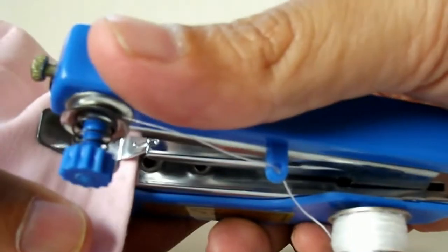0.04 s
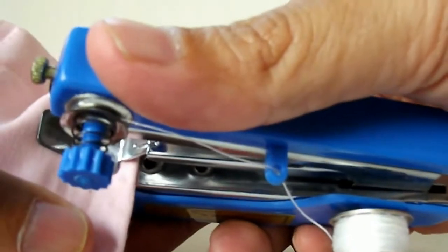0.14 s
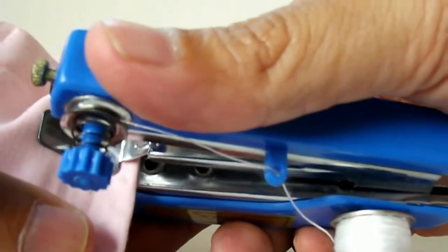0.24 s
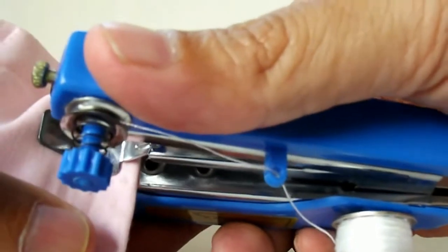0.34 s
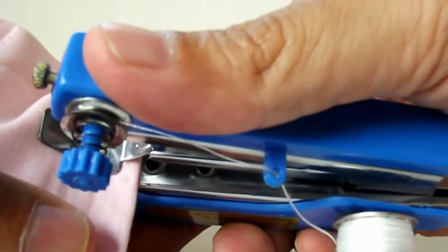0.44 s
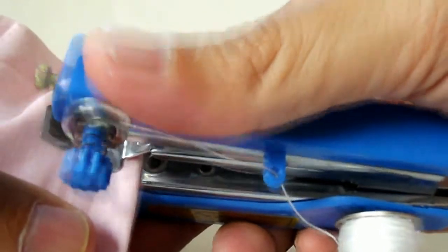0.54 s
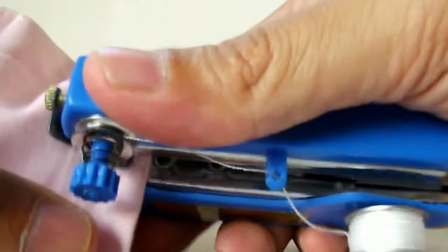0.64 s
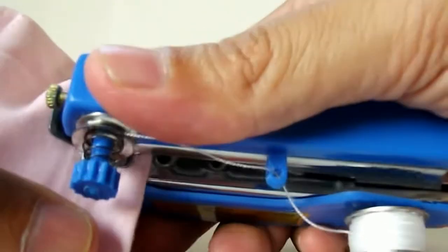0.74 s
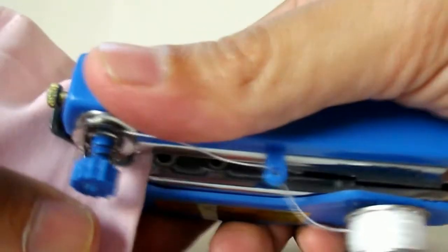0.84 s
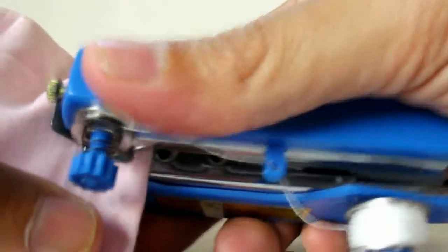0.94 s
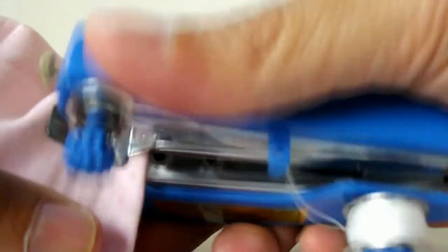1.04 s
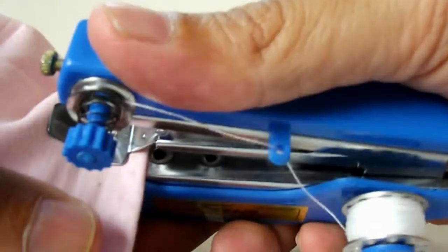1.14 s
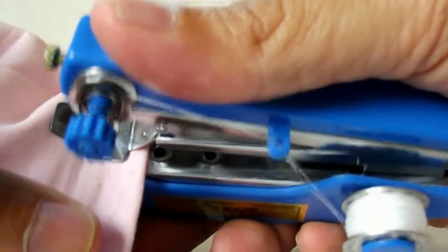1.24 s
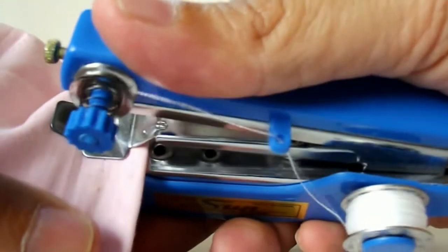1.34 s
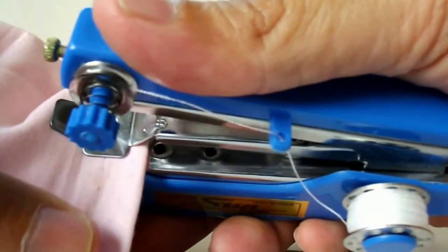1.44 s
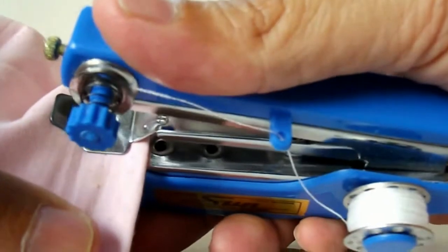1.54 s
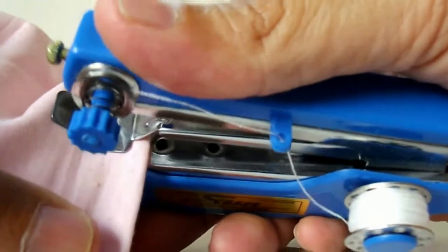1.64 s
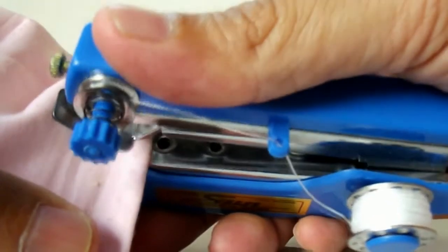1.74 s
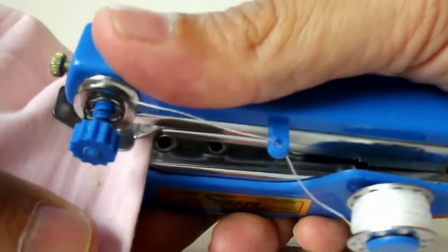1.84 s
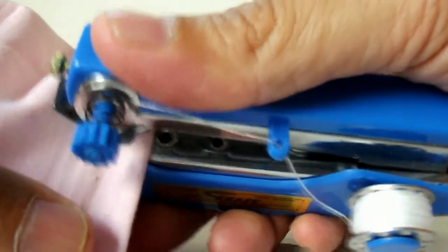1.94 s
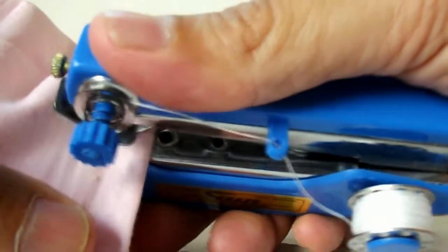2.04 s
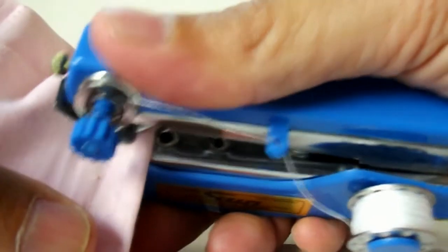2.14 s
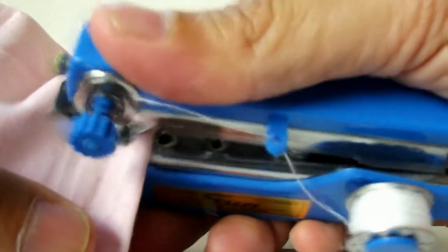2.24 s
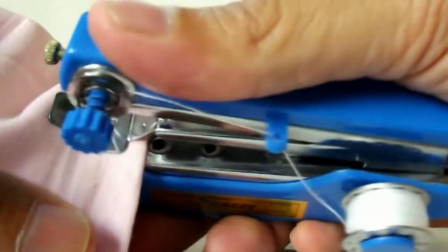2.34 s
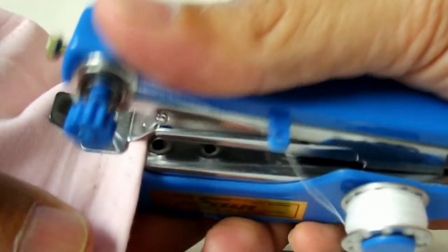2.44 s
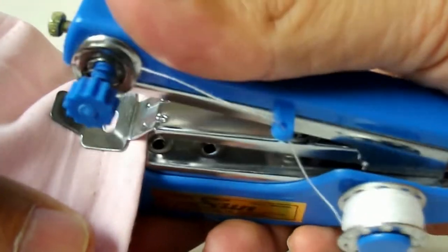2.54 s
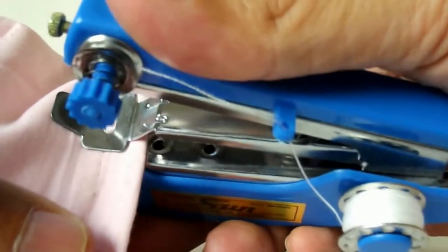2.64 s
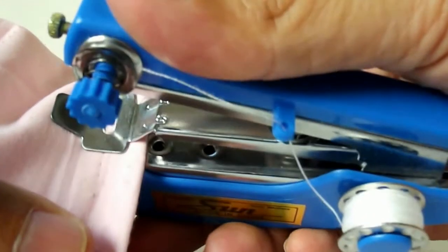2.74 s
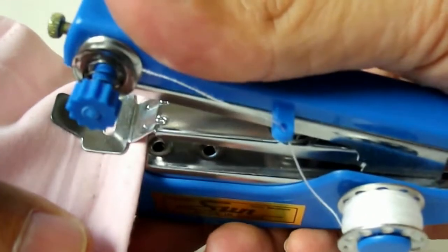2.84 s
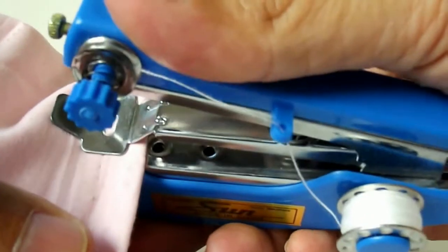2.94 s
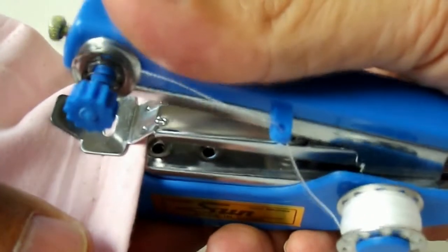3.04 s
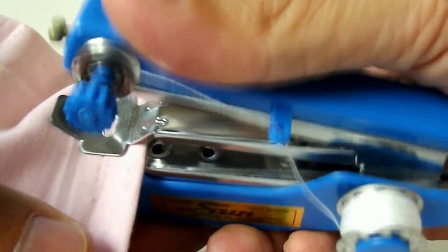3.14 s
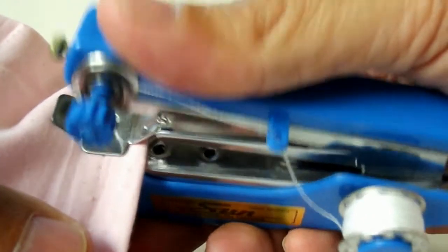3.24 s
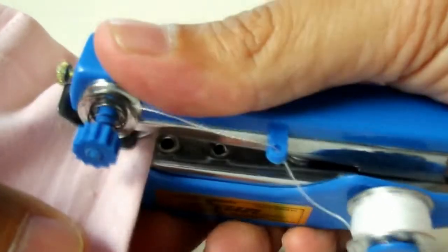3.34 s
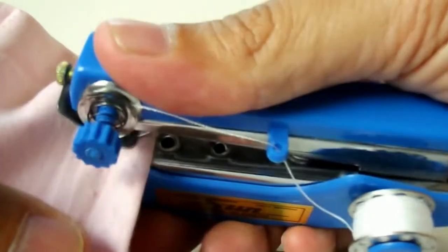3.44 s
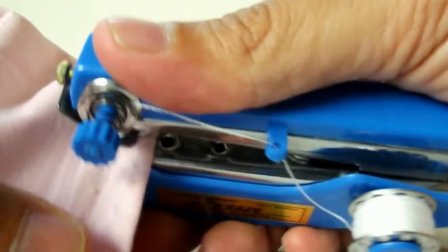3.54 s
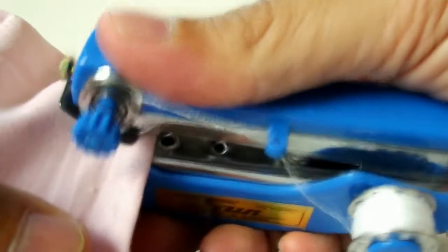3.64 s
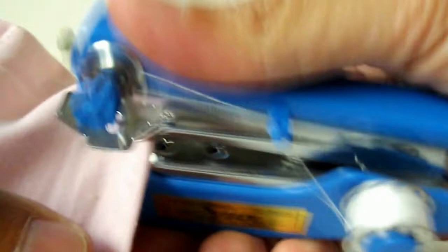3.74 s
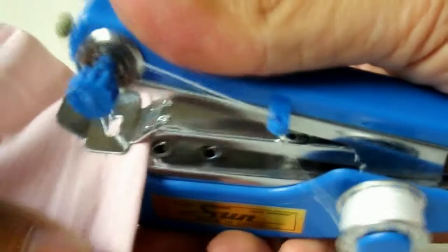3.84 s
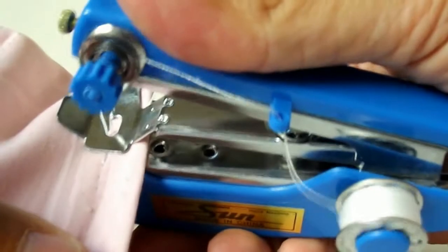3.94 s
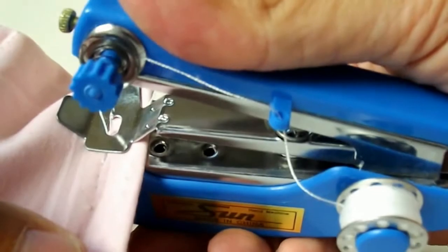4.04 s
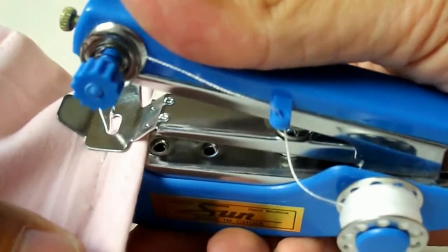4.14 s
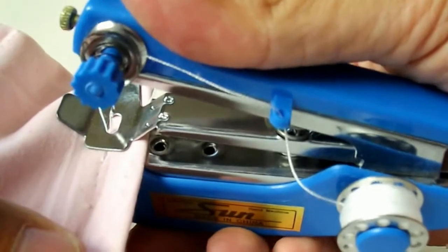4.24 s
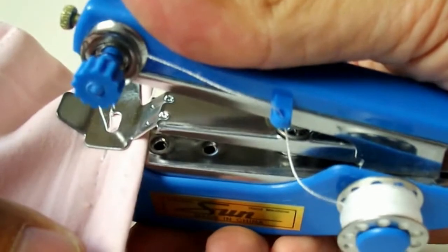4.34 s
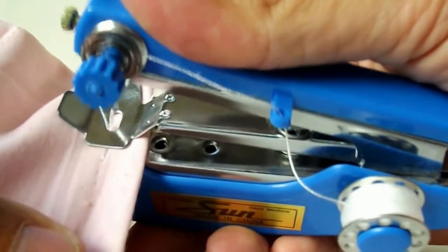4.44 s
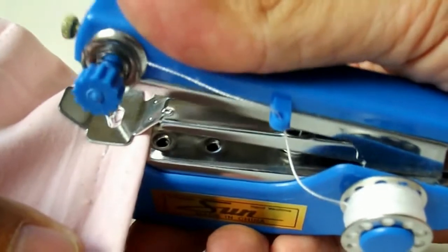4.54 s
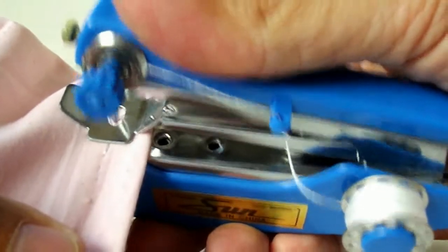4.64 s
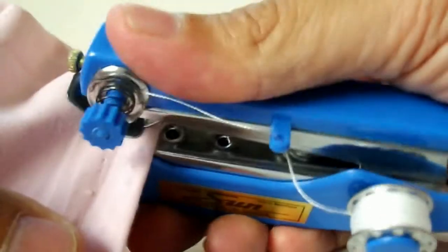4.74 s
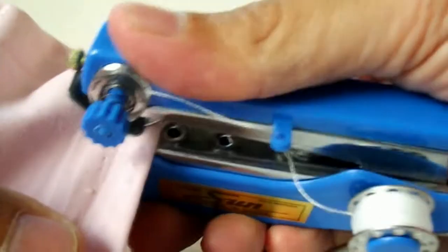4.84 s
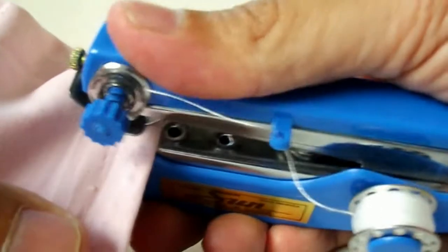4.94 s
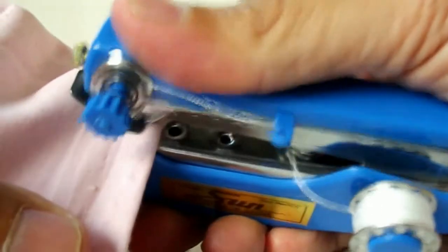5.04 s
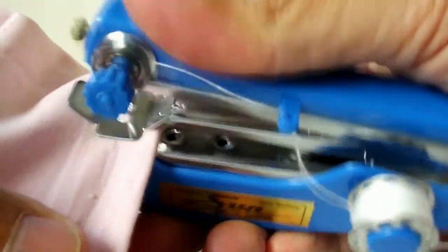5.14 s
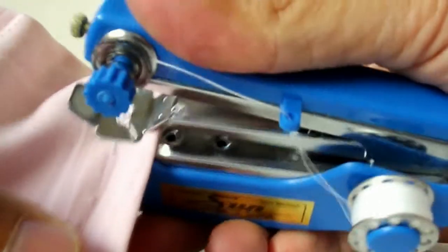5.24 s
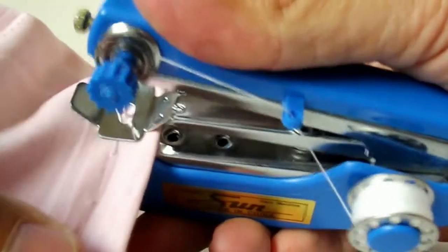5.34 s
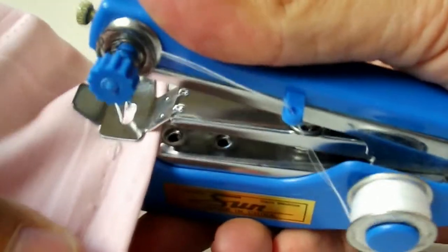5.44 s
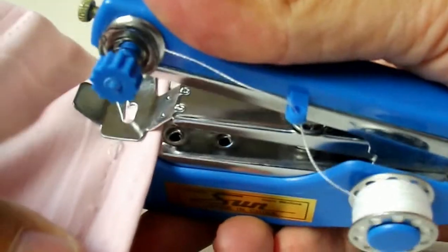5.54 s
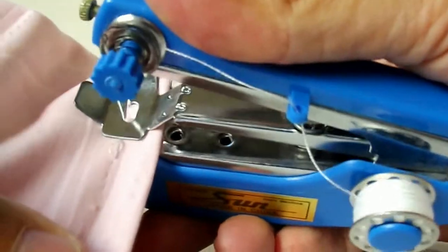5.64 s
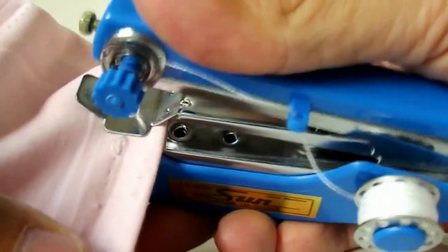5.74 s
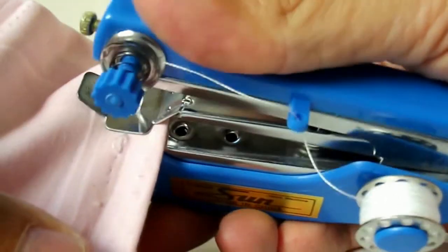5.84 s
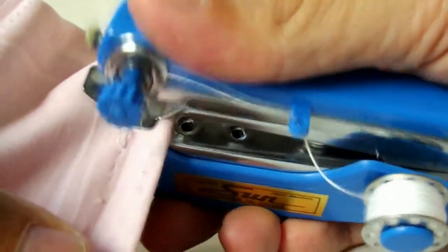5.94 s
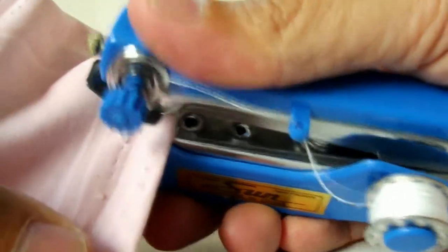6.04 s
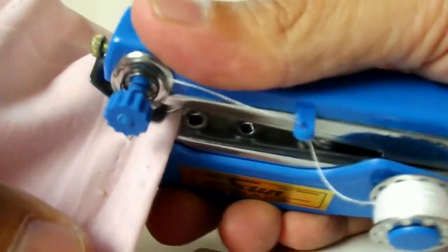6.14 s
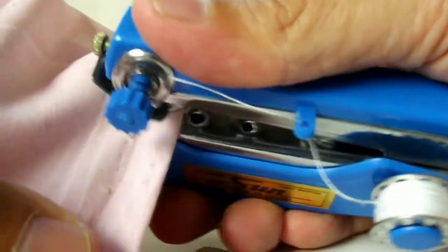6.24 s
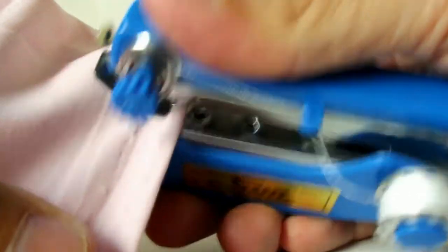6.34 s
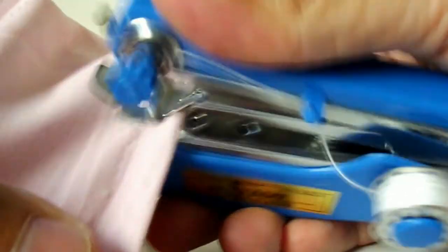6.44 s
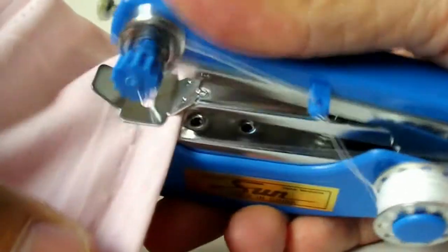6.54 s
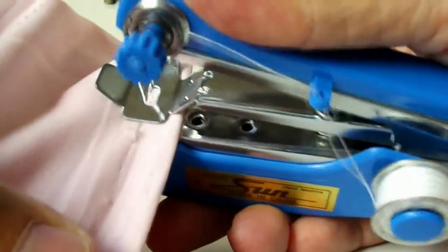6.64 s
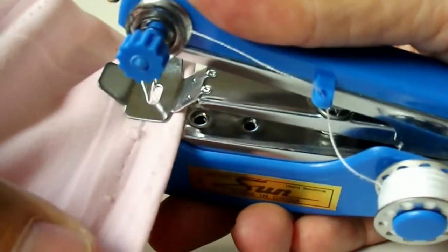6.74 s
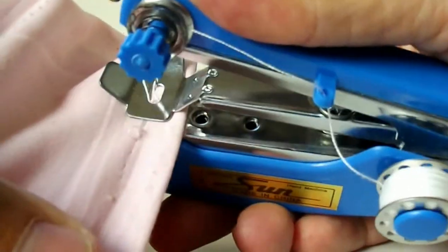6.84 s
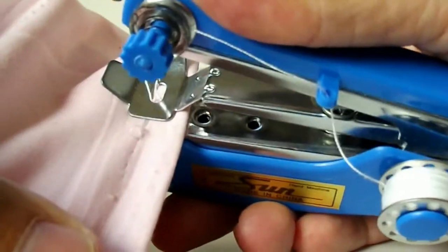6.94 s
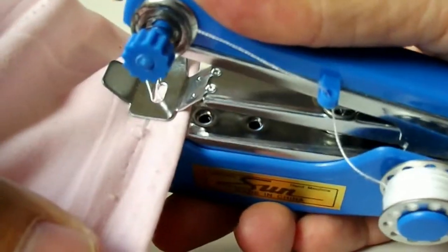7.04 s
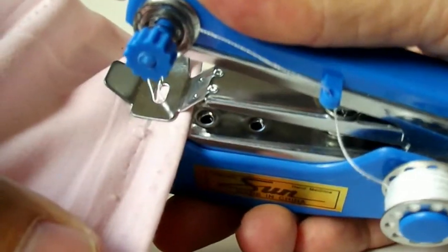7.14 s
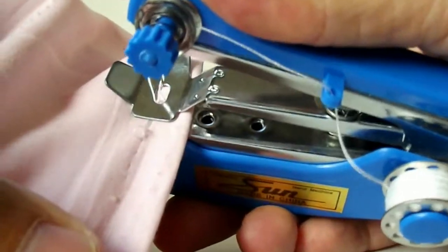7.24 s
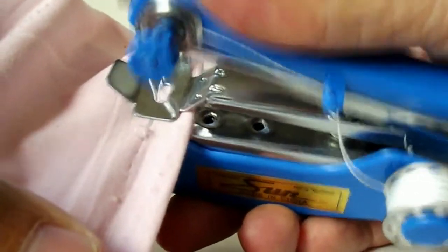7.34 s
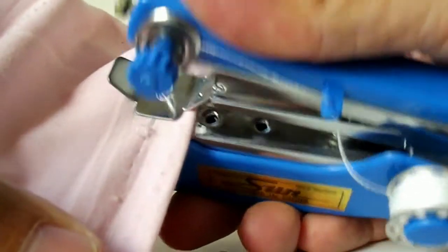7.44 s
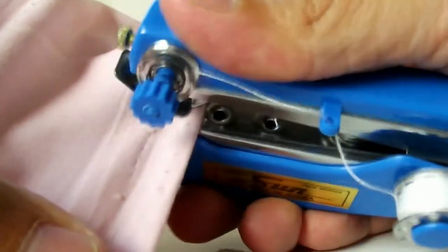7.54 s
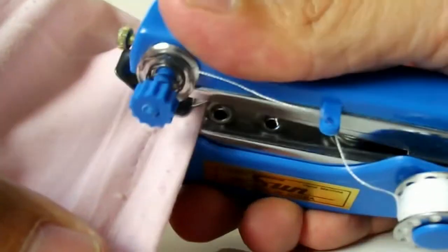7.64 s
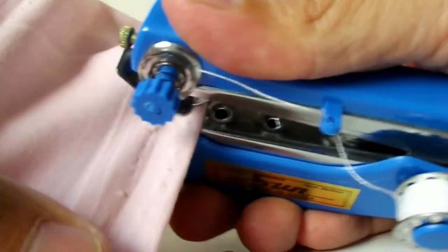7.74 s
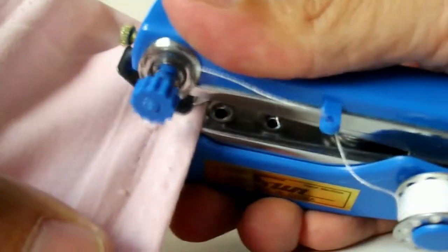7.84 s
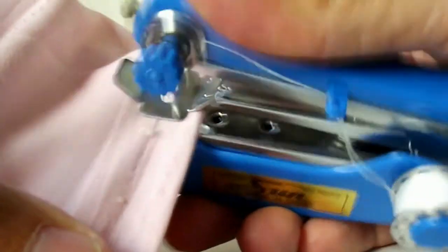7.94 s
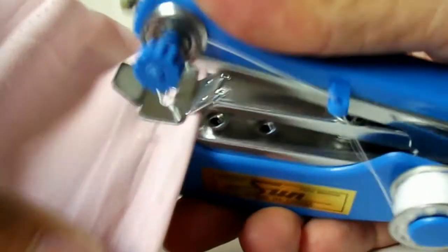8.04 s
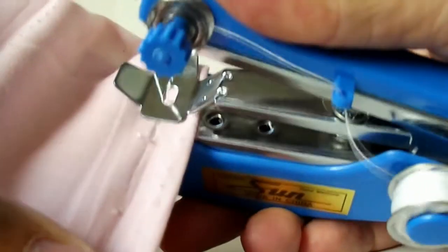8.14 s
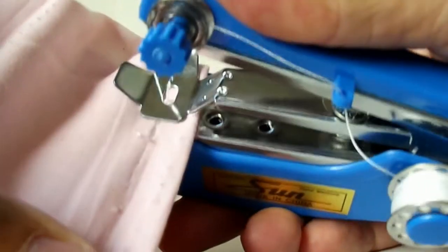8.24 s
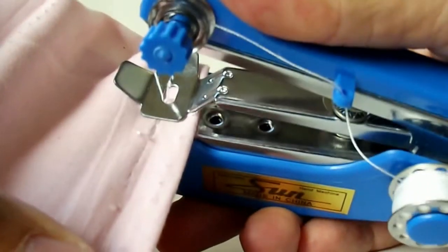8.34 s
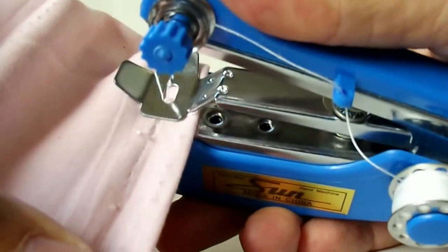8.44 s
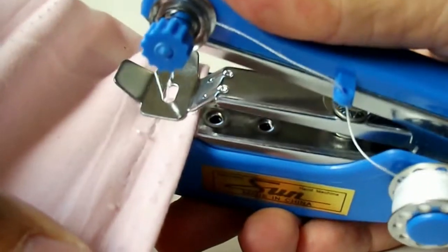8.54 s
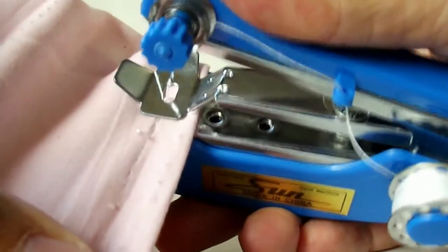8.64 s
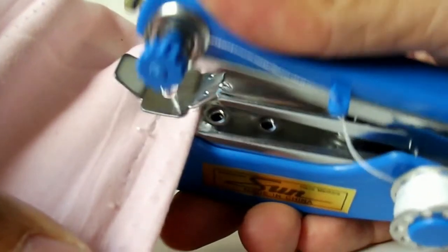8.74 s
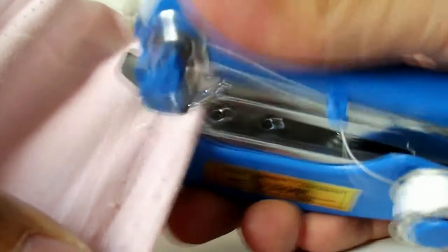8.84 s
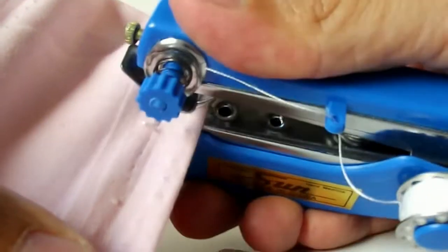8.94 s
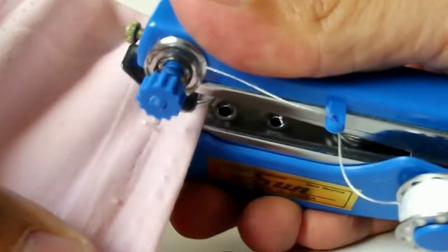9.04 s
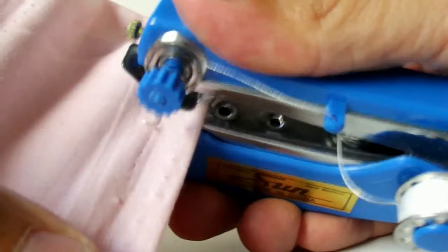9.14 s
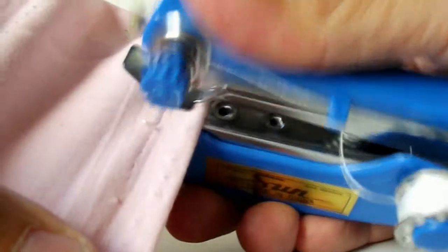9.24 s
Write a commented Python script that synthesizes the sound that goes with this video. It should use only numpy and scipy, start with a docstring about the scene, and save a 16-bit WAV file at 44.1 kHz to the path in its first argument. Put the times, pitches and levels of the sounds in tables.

```python
"""A small hand-held stitcher of sheet metal and plastic is squeezed and let go, close to a phone microphone.
Knocks and rattles are short chatters fed into a ringing frame; scrapes feed it dense grit.
Springs and a squeaking hinge are wavering tones. Behind them lie room reflections, rumble, hum and hiss.
Gain control ducks the room after loud clacks, which overload the input."""
import sys
import numpy as np
from scipy import signal
from scipy.fft import irfft
from scipy.io import wavfile
from scipy.ndimage import uniform_filter1d

SR = 44100
rng = np.random.default_rng(int(sys.argv[2]) if len(sys.argv) > 2 else 0)


def level_to_linear(level):
    """Convert decibel levels to linear amplitude factors, elementwise."""
    exponent = np.asarray(level, float) / 20
    return 10 ** exponent


def wav_record(signal):
    """Record a signal, one row per channel, as 16-bit PCM in the file named by sys.argv[1]."""
    frames = np.transpose(np.atleast_2d(signal))
    bounded = np.clip(frames, -1, 1)
    # unit amplitude maps onto the largest positive 16-bit level
    quanta = np.round(bounded * 32767).astype(np.int16)
    wavfile.write(sys.argv[1], SR, quanta)


N = 409688  # length in samples


def read(points, hz):
    """Reads a table of (pitch, value) at hz, along a log pitch axis."""
    table_hz, value = np.transpose(points)
    return np.interp(np.log(hz + 1), np.log(table_hz + 1), value)


def evened(x):
    """Scales to rms 1."""
    return x / np.sqrt(np.mean(x ** 2) + 1e-20)


def add(mix, start_s, sound):
    """Mixes sound, one row or several, into mix from start_s on."""
    part = mix[..., round(start_s * SR):][..., :sound.shape[-1]]
    part += sound[..., :part.shape[-1]]


def circuit():
    """Steady electronic hiss and a faint whine born after the gain stage, so they never duck."""
    hiss_db, hiss_top_hz = -58, 9000
    whine_db, whine_hz = -71, 5730  # peak level
    low_pass = signal.butter(10, hiss_top_hz, fs=SR, output="sos")
    hiss = signal.sosfilt(low_pass, rng.standard_normal(N))
    whine = np.sin(2 * np.pi * whine_hz * np.arange(N) / SR)
    return level_to_linear(hiss_db) * hiss + level_to_linear(whine_db) * whine


# tone colour of the room's own noise; only the differences count: (pitch_hz, relative_level_db)
AIR_COLOUR = [(15, -4.5), (30, -2), (62, -5), (82, -0.5), (110, -6.5), (390, -5.5), (700, -11.5),
              (1170, -12.5), (1400, -8), (1920, -13.5), (2200, -22.5), (3300, -27.5), (4000, -34.5),
              (6000, -43.5), (9300, -58.5), (10500, -80.5)]
# how the mains hum swells and sinks: (time_s, rms_level_db)
HUM_LEVELS = [(0, -45), (1.5, -47.5), (2.7, -44), (3.2, -43), (4.1, -41.5), (5.5, -36.5), (6.2, -43),
              (7.2, -38), (8.5, -37.5), (9.289, -46.5)]


def air():
    """Distant rumble and hiss: coloured noise with faint drifting patches, plus the mains hum as a sine."""
    air_db, patch_db, hum_hz = -31.5, 1.8, 50
    frames, hz = N // 512 + 5, np.fft.rfftfreq(2048, 1 / SR)
    real, imaginary, patches = rng.standard_normal((frames, 1025, 3)).T
    # smoothed over pitch, then over time
    patches = evened(uniform_filter1d(uniform_filter1d(patches, 16, 0), 8, 1))
    colour = level_to_linear(read(AIR_COLOUR, hz)[:, None] + patch_db * patches)
    noise = signal.istft((real + 1j * imaginary) * colour, nperseg=2048, noverlap=1536)[1]
    t = np.arange(N) / SR
    hum_level = level_to_linear(np.interp(t, *np.transpose(HUM_LEVELS)))
    hum = np.sqrt(2) * hum_level * np.sin(2 * np.pi * hum_hz * t)
    return level_to_linear(air_db) * evened(noise[:N]) + hum


# time the reflections take to die by 60 dB: (pitch_hz, decay_s)
ROOM_DECAY = [(250, 0.2), (700, 0.42), (1700, 0.8), (3000, 0.42), (4300, 0.75), (5600, 0.42), (7500, 0.4)]


def room(x):
    """Sparse reflections, each band dying at its own speed, smeared into an even, diffuse wash."""
    room_db, turn_per_s = -18.5, 1400  # turn in radians
    out, turn = np.zeros(N), np.arange(N) / SR * turn_per_s
    at = np.arange(300, SR - 20, 20)  # one reflection somewhere in every 20 samples
    for k in range(3):
        taps = np.zeros(SR)
        taps[at + rng.integers(0, 20, len(at))] = rng.choice([-1., 1.], len(at))
        hz, t, bands = signal.stft(taps, SR, nperseg=256)
        decay = level_to_linear(-60 * t / read(ROOM_DECAY, hz)[:, None])
        tail = signal.istft(bands * decay, SR, nperseg=256)[1]
        # three reflection patterns take turns very fast, which evens out the tail
        share = np.sqrt(2 / 3) * np.cos(turn + k * np.pi / 3)
        out += signal.oaconvolve(x * share, tail / np.linalg.norm(tail))[:N]
    return level_to_linear(room_db) * out


# springs and plates left singing; level is at the start, a negative fade swells:
# (start_s, length_s, pitch_hz, rms_level_db, fade_db_per_s)
SPRING_RINGS = [(.15, 0.17, 578, -34.5, 6), (.37, 0.043, 587, -32.5, 33), (1.812, 0.067, 607, -15.5, 57),
                (1.812, 0.071, 1300, -21.5, 55), (1.812, 0.063, 1576, -20.5, 90),
                (1.89, 0.088, 1624, -16.5, 73), (1.89, 0.21, 1272, -39, 48), (2.05, .1, 1666, -36.5, 30),
                (2.34, 0.069, 760, -37, -30), (2.33, 0.16, 1710, -27.5, 18), (2.46, 0.15, 1713, -27.5, 69),
                (2.57, 0.2, 853, -40.5, 9), (3.7, 0.082, 1700, -23.5, 27), (3.78, .15, 1700, -24, 82),
                (5.075, 0.084, 768, -20.5, 16), (5.14, 0.19, 767, -19, 96), (5.36, 0.12, 759, -24.5, 61),
                (5.08, 0.133, 1728, -28.5, 22), (6.39, 0.14, 755, -31, 33), (6.39, 0.32, 1290, -38, 31),
                (7.85, 0.2, 752, -23.5, 0), (7.93, .11, 740, -21, 51), (7.93, 0.052, 1690, -18, 60),
                (9.19, 0.072, 752, -22.5, -26), (9.25, 0.038, 761, -18.5, 5), (9.19, 0.09, 1704, -20, 16)]
# the hinge squeaks under slow pressure, in wide wavering lines:
# (start_s, length_s, pitch_hz, rms_level_db, fade_db_per_s)
HINGE_SQUEAKS = [(4.39, .2, 1073, -32, -26), (4.45, .14, 1514, -34.5, -14), (4.68, .32, 1090, -37, 6)]


def springs():
    """Thin ringing and squeaking tones; a random walk of the phase smears each line to its width."""
    ring_width_hz, squeak_width_hz, flutter_db = 5, 55, 1.9
    out = np.zeros(N)
    flutter = level_to_linear(flutter_db * evened(uniform_filter1d(rng.standard_normal(N), 500)))
    walk = np.cumsum(rng.standard_normal(N)) * np.sqrt(2 * np.pi / SR)
    walk = uniform_filter1d(walk, 90)
    for rows, width_hz in ((SPRING_RINGS, ring_width_hz), (HINGE_SQUEAKS, squeak_width_hz)):
        for start_s, length_s, pitch_hz, level_db, fade_db in rows:
            at = np.arange(round(start_s * SR), min(round((start_s + length_s) * SR), N))
            phase = 2 * np.pi * pitch_hz * at / SR + np.sqrt(width_hz) * walk[at]
            tone = np.sqrt(2) * np.sin(phase)
            level = level_to_linear(level_db - fade_db * (at / SR - start_s))
            out[at] += level * tone * signal.windows.tukey(len(at), .2)
    return out * flutter


# the modes frame and shell ring with; levels count only within a group, decay is the time to die by 60 dB:
# (pitch_hz, relative_level_db, decay_s)
FRAME_MODES = [(473, -23.5, 0.035), (616, 10.5, 0.059), (750, 10, 0.043), (864, 24, 0.014),
               (1027, 15.5, 0.04), (1369, -5.5, 0.043), (1551, 4.5, 0.02), (1661, 7.5, 0.033),
               (1794, -1, 0.03), (1910, -18, .02), (2474, -18.5, 0.052), (3150, 9, 0.013),
               (3416, 10, 0.0098), (3903, 9, 0.019), (4123, 9.5, 0.0087), (4340, -5, 0.065),
               (4700, -33, .01), (5800, -22, .008), (6700, 5, 0.0072), (7550, 17, 0.0023),
               (9100, -8.5, 0.0065), (10200, -12, 0.0028), (12500, -11, .002)]


def mode_groups():
    """Decaying sines of the frame, summed into low, middle, high and top groups of energy 1 each."""
    group_tops_hz = [1150, 2800, 5400]  # of low, middle and high
    t, groups = np.arange(2048) / SR, np.zeros((4, 2048))
    for pitch_hz, level_db, decay_s in FRAME_MODES:
        group = np.searchsorted(group_tops_hz, pitch_hz)
        groups[group] += level_to_linear(level_db - 60 * t / decay_s) * np.sin(2 * np.pi * pitch_hz * t)
    return groups / np.linalg.norm(groups, axis=1, keepdims=True)


def levels(middle_db, low_db, high_db):
    """Gains for the low, middle, high and top modes; softer contacts are duller."""
    top_db = high_db - 13 + .4 * np.minimum(middle_db + 10, 5)
    return level_to_linear(middle_db + np.array([[low_db], [0], [high_db], [top_db]]))


def stroke(u):
    """Pressure over a stroke, u from 0 to 1: bites fast, eases off."""
    bite, ease = 0.11, 0.32  # shares of the stroke spent rising and easing off
    return np.clip(np.minimum(u / bite, (1 - u) / ease), 1e-3, 1)


def grit(per_s, spread_db):
    """Dense tiny impacts of random sign and uneven size."""
    size = level_to_linear(spread_db * np.minimum(rng.exponential(1, N), 4)) * rng.standard_normal(N)
    return evened(size * (rng.random(N) < per_s / SR))


# sliding of the arm, needle and feed plate; low and high are relative to the middle modes:
# (start_s, end_s, middle_db, low_db, high_db)
SLIDES = [(0.38, 0.507, -34.5, -2, -19), (0.519, 0.637, -14, -27, -13.5), (0.917, 0.997, -15.5, -6.5, -14),
          (1.222, 1.293, -31, -7, -21), (1.674, 1.692, -22.5, -3.5, -13), (1.687, 1.787, -23.5, -6, -9),
          (2.225, 2.336, -19, 1, -14.5), (2.413, 2.555, -22.5, -8, -30), (3.111, 3.197, -33, -1, -17.5),
          (3.212, 3.374, -24, -7.5, -16), (3.625, 3.714, -16.5, -1.5, -11), (3.711, 3.783, -27.5, 0, -15),
          (4.44, 4.599, -36.5, 3.5, -14.5), (4.584, 4.659, -8.5, -14.5, -24.5),
          (5.002, 5.182, -25, -12, -18), (5.32, 5.506, -31, -1, -28.5), (5.623, 5.735, -42, 4.5, -11),
          (5.869, 5.942, -18.5, -11, -19), (5.921, 6.025, -19, -24.5, -36),
          (6.331, 6.418, -14.5, -5.5, -10.5), (6.515, 6.675, -33, 1, -38), (7.225, 7.371, -37, -1, -25),
          (7.384, 7.478, -30, -30, -23.5), (7.808, 7.876, -18.5, -6, -7), (7.87, 8.05, -23, -0.5, -26),
          (8.594, 8.745, -36, -4, -16), (8.736, 8.865, -18, -14, -15), (9.136, 9.222, -19.5, -5.5, -10),
          (9.208, 9.321, -21.5, -5, -17.5)]


def scrapes():
    """Metal sliding on metal and cloth: grit into the frame under a stroke that bites, wavers and eases off."""
    push = np.zeros((4, N))
    for start_s, end_s, middle_db, low_db, high_db in SLIDES:
        u = np.linspace(0, 1, round((end_s - start_s) * SR))
        add(push, start_s, levels(middle_db, low_db, high_db) * stroke(u))
    waver = evened(uniform_filter1d(rng.standard_normal(N), 150))
    force = push * level_to_linear(2.4 * waver) * grit(per_s=4000, spread_db=2.5)
    return signal.oaconvolve(force, mode_groups(), axes=1)[:, :N].sum(0)


def rattles():
    """Loose parts knock at random moments of each slide, following its pressure and roughly its colour."""
    per_s, over_scrape_db, longest_s = 48, 4, .006
    spread_db, colour_db = 3, 5  # chance spread of level and of colour
    draws, rows = rng.random((len(SLIDES), 16, 2)), []
    spread = rng.standard_normal((len(SLIDES), 16, 3))
    for (start_s, end_s, middle_db, low_db, high_db), draw, chance in zip(SLIDES, draws, spread):
        count = round((end_s - start_s) * per_s)
        for k, ((place, contact), (size, low, high)) in enumerate(zip(draw[:count], chance)):
            u = (k + place) / count
            level_db = middle_db + 20 * np.log10(stroke(u)) + over_scrape_db + spread_db * size
            rows.append((start_s + u * (end_s - start_s), level_db, low_db + colour_db * low,
                         high_db + colour_db * high, longest_s * contact))
    return rows


# the knocks that stand out; low and high are relative to the middle modes:
# (start_s, middle_peak_db, low_db, high_db, contact_s)
LOUD_KNOCKS = [(.4185, -22, -4, -12, .012), (.5063, 10, -6.5, -26.5, 0.0064), (.5105, 12.5, -7, -9, .01),
               (.5201, 11.5, -5, -1, 0.0029), (.5316, 2.5, -8.5, -9, .006), (.5533, -7, -13, -6.5, .0055),
               (.591, -3, -35, -35, .011), (.8878, -16.5, -11, -15.5, 0.0038), (.928, -20, -8, 0.5, 0.028),
               (.9425, -13, 1.5, -9, 0.0057), (.9619, -2, 3.5, -13.5, 0.0061), (.9722, 0, -5, -16.5, .0075),
               (1.2193, -34.5, 15, -25, 0.0062), (1.2289, -22, -8, -9, 0.016),
               (1.2665, -24, -9, -13, 0.0071), (1.2754, -13, -4, -33, 0.0074),
               (1.6956, 9.5, 1.5, -1.5, .0047), (1.7097, -7.5, 3, -3, 0.0035), (1.8134, -10, 1, -8, 0.0065),
               (1.8832, -1, -8.5, -4, 0.013), (1.8885, 2.5, -4, -9, 0.0035),
               (1.9067, -4, -21, -18.5, 0.0056), (1.9356, -20.5, -8, -5, 0.014),
               (2.205, 2.5, -14, -12.5, .0046), (2.2196, -17, 4.5, -4.5, 0.012),
               (2.2544, -9.5, -3, -2, 0.0023), (2.279, -17.5, -2.5, -17.5, 0.0077),
               (2.288, -10.5, -7, -20, 0.0096), (2.4298, -15.5, 3, -9, 0.032),
               (2.4442, 0.2, -5, -13.5, .0037), (2.4671, -14.5, 6, -3.5, 0.0069),
               (3.135, -25.5, -3, -6, 0.0044), (3.2046, 11.5, -12, -17, .018), (3.2159, 8, -9.5, 3, 0.0049),
               (3.2303, -2.5, -16, -5, 0.0062), (3.2797, 3, -32, -21, .002),
               (3.3303, -10.5, -11, -15, 0.0018), (3.5912, -18.5, -12, -10.5, 0.0052),
               (3.628, -15, -16.5, -4, .006), (3.6493, -17, 1, -1.5, .0075),
               (3.6729, -7.5, -23, -28.5, 0.011), (3.6923, -1, -6, -21.5, 0.0033),
               (3.7677, -13, -8, -24.5, 0.016), (3.793, -25, -8, -8, .006), (3.889, -27, 5, -19, 0.0041),
               (3.935, -29, 1, -12.5, .005), (4.4621, -17.5, -2.5, -12, 0.012),
               (4.5941, 2, -9.5, -11.5, .012), (4.6097, 11.5, 1.5, -1, 0.0029),
               (4.627, -8.5, -10, -2.5, 0.0067), (4.6574, -8.5, -8, -12.5, 0.0032),
               (4.9979, -15.5, -20, -23.5, 0.0058), (5.0403, -9.5, -5.5, -5, .01),
               (5.054, -13.5, 5.5, -4.5, 0.013), (5.0785, -13, 5, -20, 0.0079),
               (5.3089, -20.5, -8, -13, 0.02), (5.3697, -15, -19, -35, 0.0081),
               (5.416, -12.5, -7.5, -21, 0.0077), (5.4436, -17, -21, -30, 0.0064),
               (5.8798, -14, 0, -3, 0.0099), (5.894, -8, -13, -9.5, .006),
               (5.9224, 2, -11.5, -13.5, 0.0023), (5.9291, 9, -1, 2, 0.0057), (5.9565, -9, -9, -13, 0.017),
               (5.9715, -13.5, 4, -9, 0.0028), (6.2774, -31.5, 3.5, 2, .004),
               (6.2956, -21.5, -9, -7, 0.0048), (6.3436, -14.5, -7, -3.5, 0.0029),
               (6.372, -4.5, -1, -10, 0.0044), (6.385, -13, 4, -4, 0.0025), (6.3971, -21, 9, 4.5, 0.0039),
               (6.52, -15, -8.5, -15, .011), (6.5313, -17, 1, -3, .007), (6.5438, -11.5, -3, -22, 0.0054),
               (6.5724, -14, -33, -19, 0.0084), (6.6454, -17.5, 3.5, -34, .006),
               (7.2852, -18.5, -9, -20, .017), (7.3826, -5, 1.5, -4.5, 0.01),
               (7.3926, 14.5, -1.7, -2.5, 0.004), (7.397, 7, -20, -9, 0.013), (7.4527, -4, -22, -16, .002),
               (7.4753, -8, -13.5, -20.5, 0.0056), (7.7747, -22, -20, -13, 0.004),
               (7.8219, -23, -11.5, -12.5, 0.0051), (7.8328, -5.5, -4, -14, .0065),
               (7.8625, -11, -1, -21.5, 0.011), (7.9268, -5.5, 0.5, -10, 0.0086),
               (7.9589, -14.5, -0.5, -26, 0.0057), (7.9958, -20.5, 8, -8, 0.0046),
               (8.68, -29, -4, -7, .006), (8.733, 4.5, -2.8, -13.5, .01), (8.7465, 7.5, -9.5, -1.5, 0.0091),
               (8.7676, -8.5, 0.5, -5.5, 0.0058), (8.8222, -3.5, -43, -32, 0.0075),
               (9.1041, -22, -18, -12, 0.0051), (9.1521, -21.5, -2.5, 5, 0.004),
               (9.1631, -13, 2.5, 0, .012), (9.1857, -4.5, 2.5, -13.5, 0.0028)]


def knocks():
    """Each contact is a short chatter into the frame: a rise, a hold and a quick fall of force."""
    # rise: for a light short touch, extra per s of contact, extra per unit of force
    rise_s, rise_per_s, rise_heavy_s = .0005, .065, .00021
    fall_s, settle_s = .0013, .0025  # settle is taken off the contact to give the hold
    out, groups, t = np.zeros(N), mode_groups(), np.arange(-.008, .03, 1 / SR)
    rows = LOUD_KNOCKS + rattles()
    chatter = rng.standard_normal((len(rows), len(t)))
    for noise, (start_s, middle_db, low_db, high_db, contact_s) in zip(chatter, rows):
        hold = max(contact_s - settle_s, .0004)
        rise = rise_s + rise_per_s * contact_s + rise_heavy_s * level_to_linear(middle_db)
        force = noise * np.exp(np.minimum(t / rise, 0) - np.maximum(t - hold, 0) / fall_s)
        rings = signal.fftconvolve(force[None], groups, axes=1)
        # the table's levels are peaks of this short-time level
        loudest = np.sqrt(uniform_filter1d(2 * rings ** 2, 100).max(1, keepdims=True))
        add(out, start_s + t[0], (levels(middle_db, low_db, high_db) * rings / loudest).sum(0))
    return out


def scene():
    """One microphone hears the stitcher, its reflections and the room."""
    small_body = signal.butter(4, 380, "high", fs=SR, output="sos")  # too small to radiate bass
    stitcher = signal.sosfilt(small_body, knocks() + scrapes()) + springs()
    mono = stitcher + room(stitcher) + air()
    return np.array([mono, mono])


# narrow dips of the phone housing: (pitch_hz, width_hz, depth_db)
HOUSING_DIPS = [(2220, 58, 6), (3000, 240, 4.5), (4570, 220, 4.5), (5660, 1530, 7)]


def microphone(x):
    """Narrow dips of the phone housing and a steep step down at the band edge."""
    edge_hz = 8950
    hz = np.fft.rfftfreq(1024, 1 / SR)
    dips_db = sum(depth_db / (1 + (2 * (hz - pitch_hz) / width_hz) ** 2)
                  for pitch_hz, width_hz, depth_db in HOUSING_DIPS)
    steep = 1 / (1 + (hz / edge_hz) ** 60)
    remainder = level_to_linear(-18.5) / (1 + (hz / edge_hz) ** 4)  # what stays above the step
    taps = np.roll(irfft(level_to_linear(-dips_db) * (steep + remainder)), 512) * np.hanning(1024)
    return signal.oaconvolve(x, taps, "same")


def band_limit(x):
    """A steep low-pass at the top of the band."""
    return signal.sosfilt(signal.butter(12, 9770, fs=SR, output="sos"), x)


def record(dry):
    """Gain control, band limit, overload; the left channel comes two samples late."""
    threshold_db, cut_per_db, recovery_db_per_s = -17, 0.46, 24.3
    power_db = 10 * np.log10(abs(uniform_filter1d(dry[0] ** 2, 900)) + 1e-12)
    over_db = np.maximum(power_db - threshold_db, 0) * cut_per_db
    # the cut jumps up with a loud sound, then recovers steadily
    fall = np.arange(N) * recovery_db_per_s / SR
    held_db = np.maximum.accumulate(over_db + fall) - fall
    cut_db = signal.lfilter([.002], [1, -.998], held_db)  # smoothed
    x = microphone(dry[0]) / level_to_linear(cut_db) + circuit()
    # the input saturates with a hard knee at full scale
    x = x / (1 + abs(x) ** 20) ** (1 / 20)
    return band_limit(np.array([np.roll(x, 2), x]))


dry = scene()
out = record(dry)
wav_record(out)
```